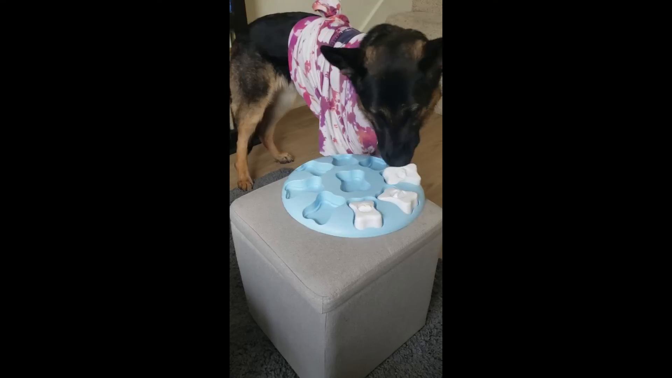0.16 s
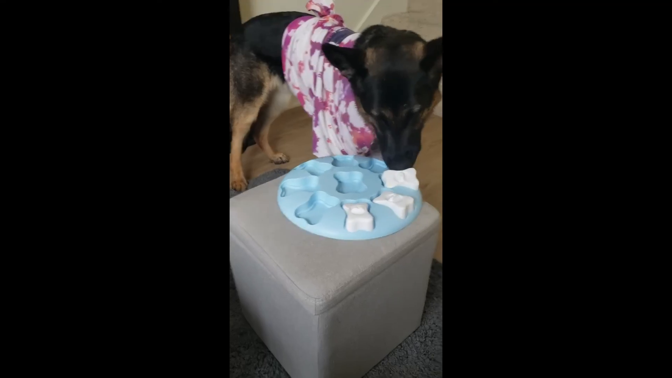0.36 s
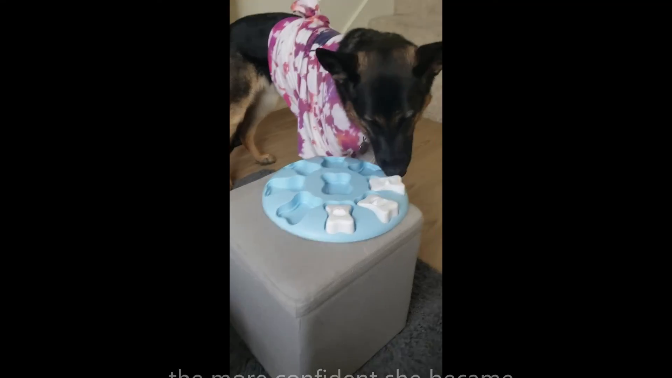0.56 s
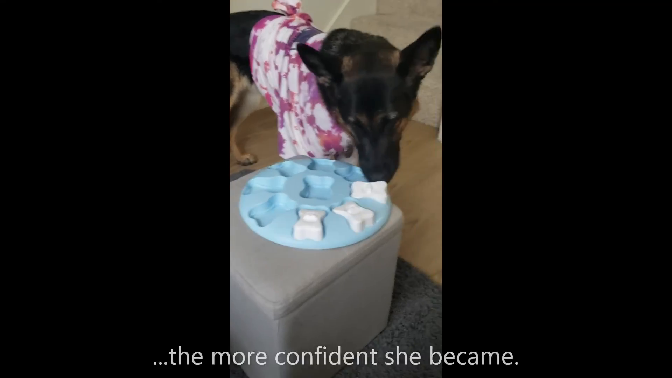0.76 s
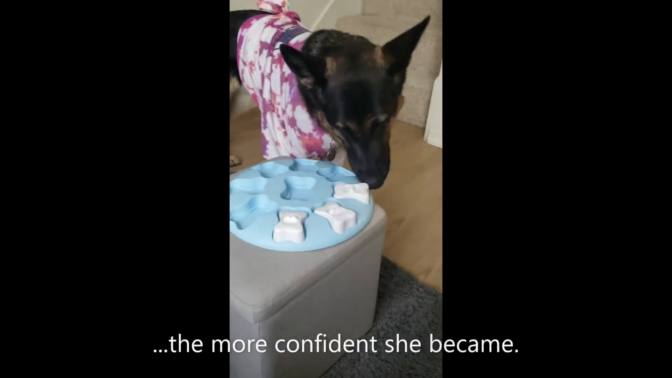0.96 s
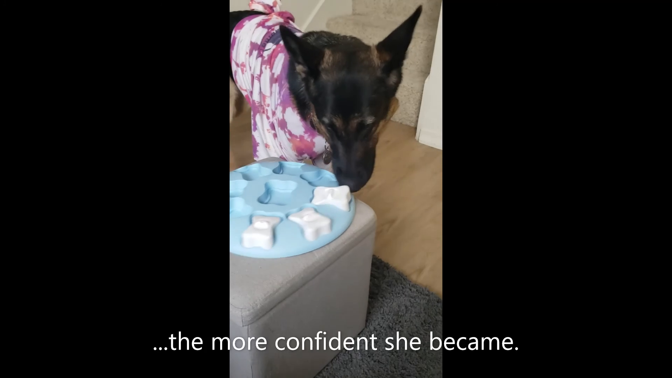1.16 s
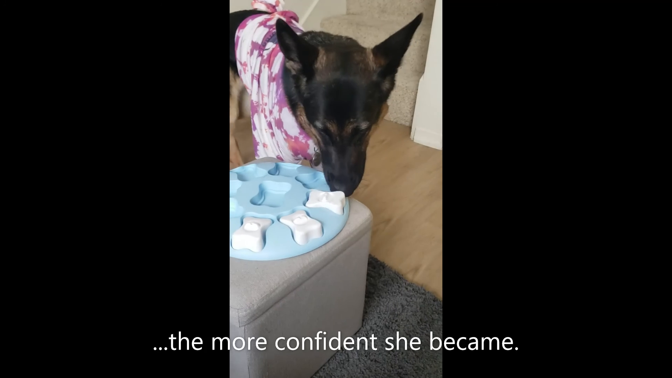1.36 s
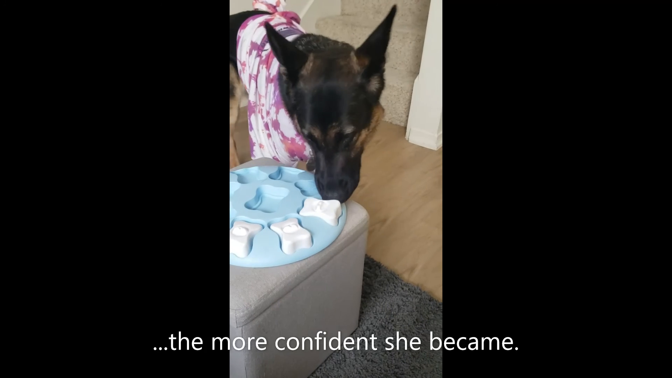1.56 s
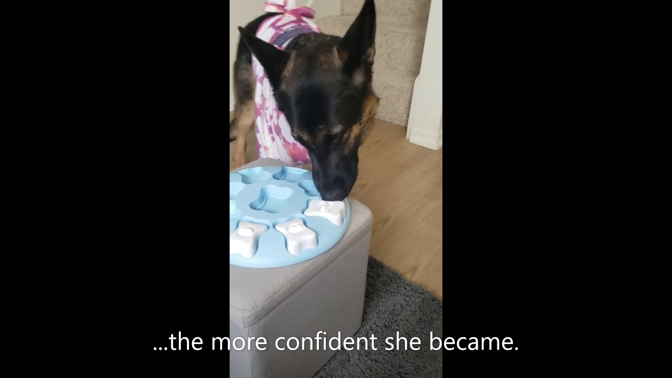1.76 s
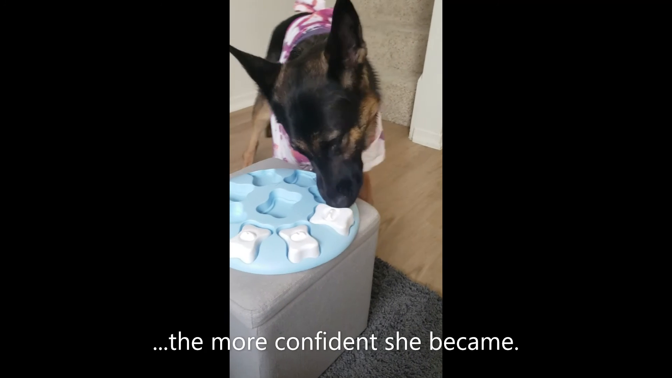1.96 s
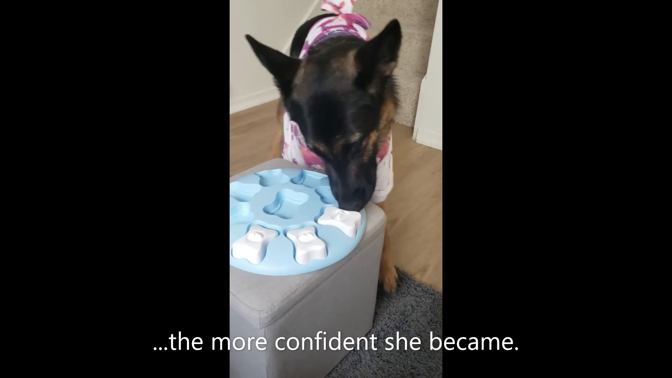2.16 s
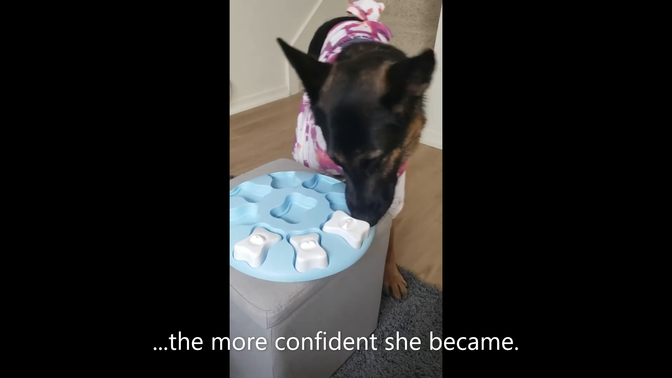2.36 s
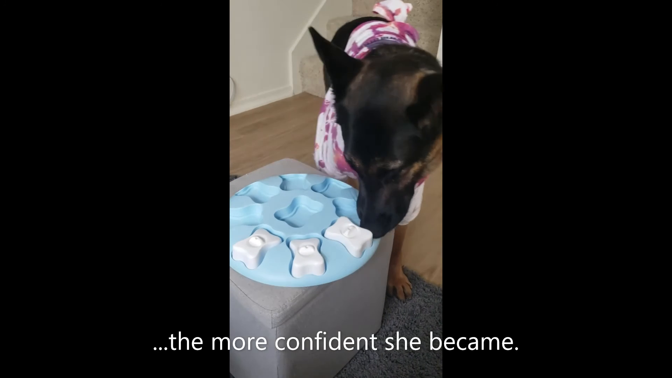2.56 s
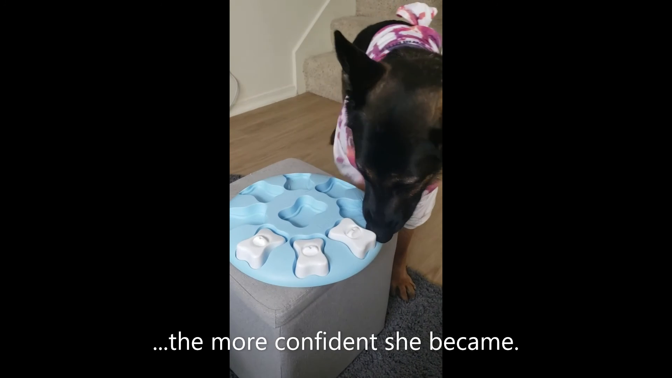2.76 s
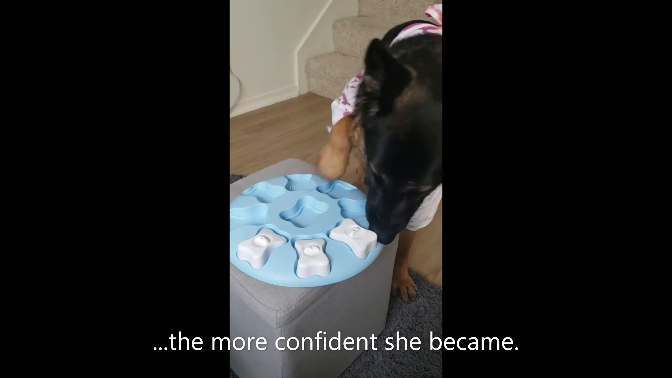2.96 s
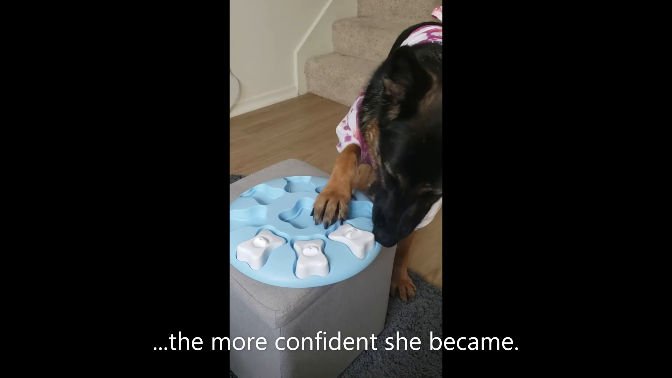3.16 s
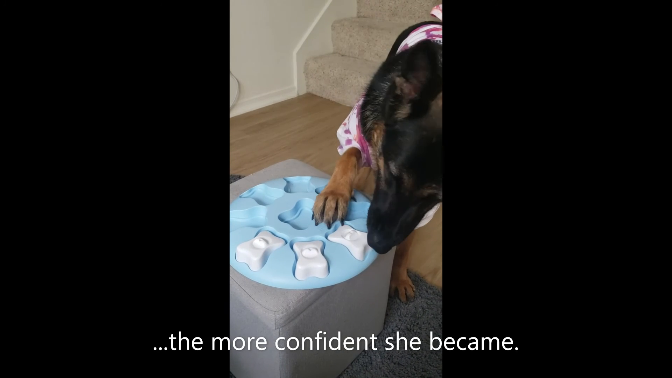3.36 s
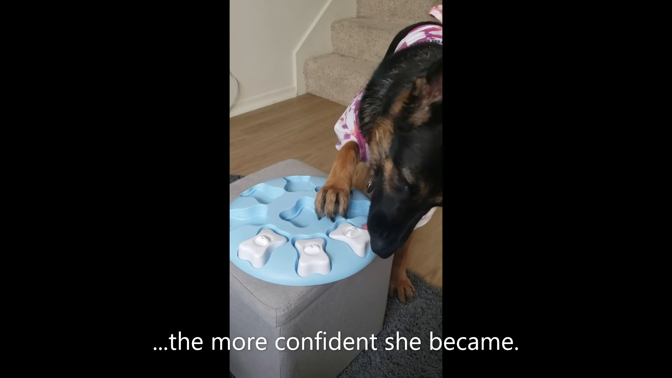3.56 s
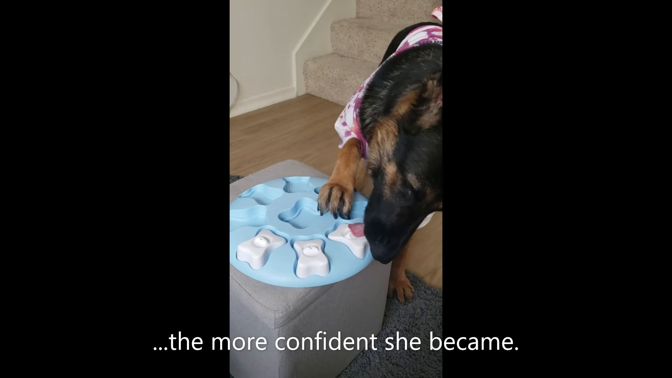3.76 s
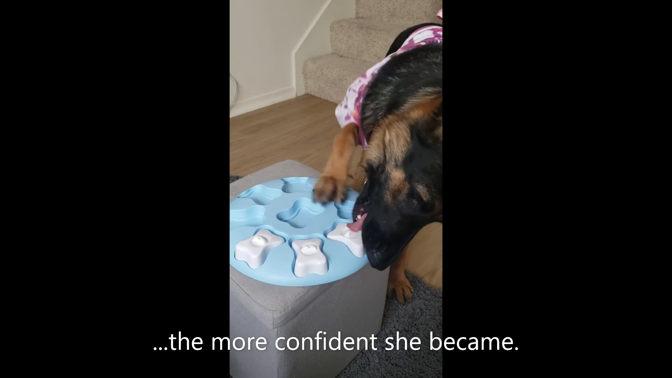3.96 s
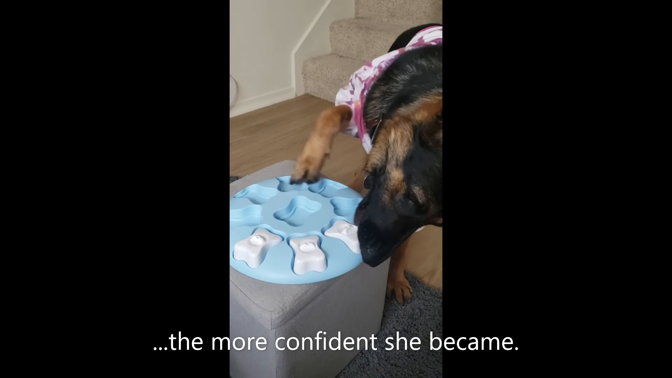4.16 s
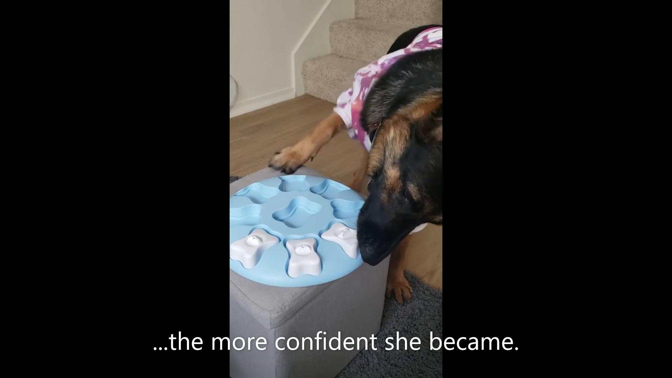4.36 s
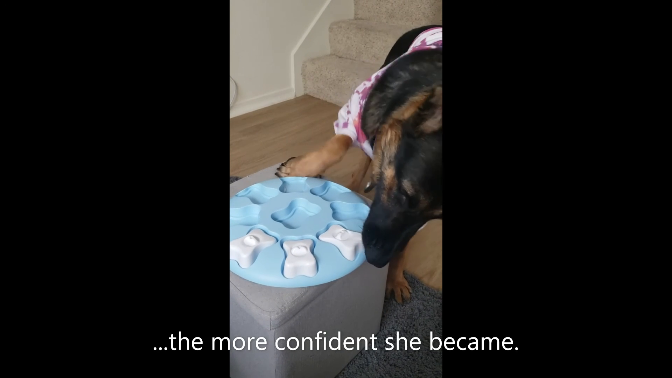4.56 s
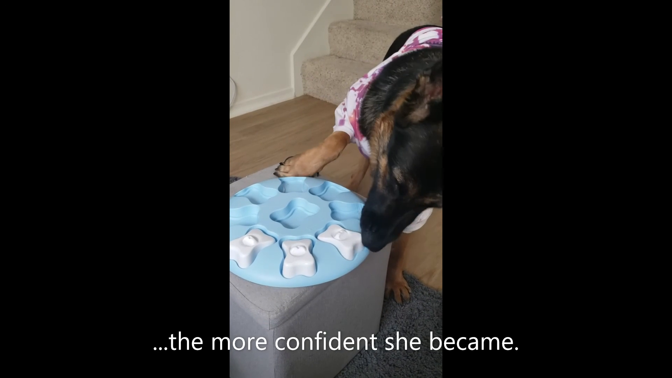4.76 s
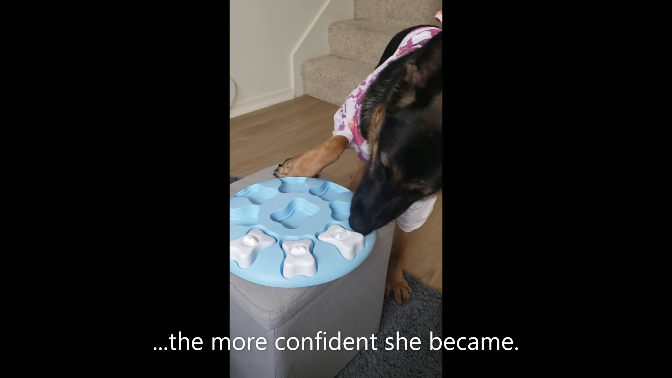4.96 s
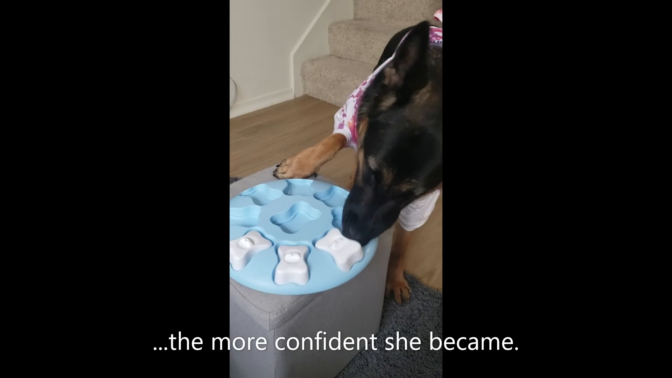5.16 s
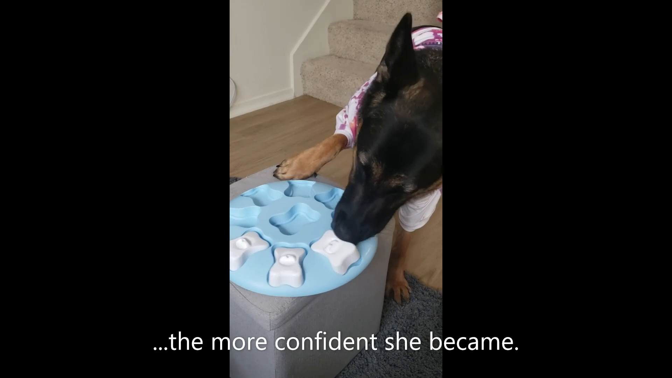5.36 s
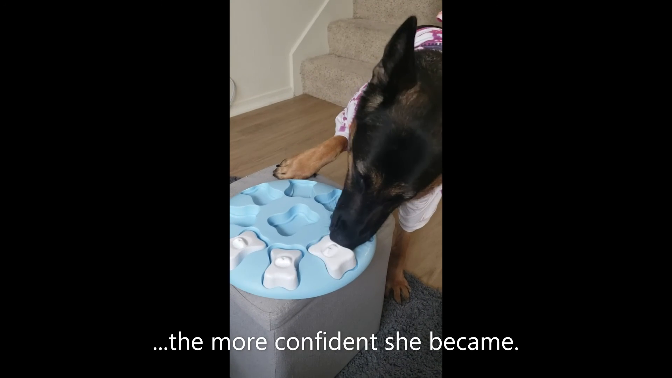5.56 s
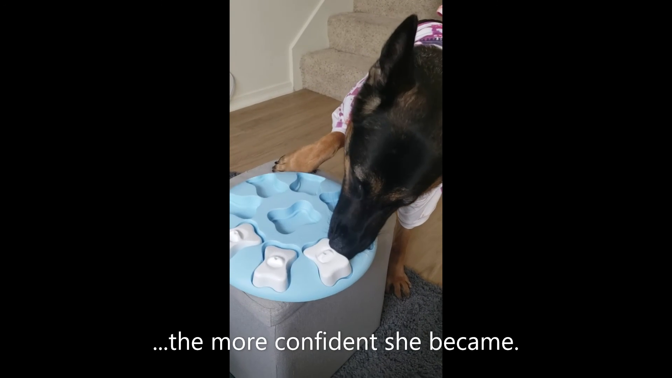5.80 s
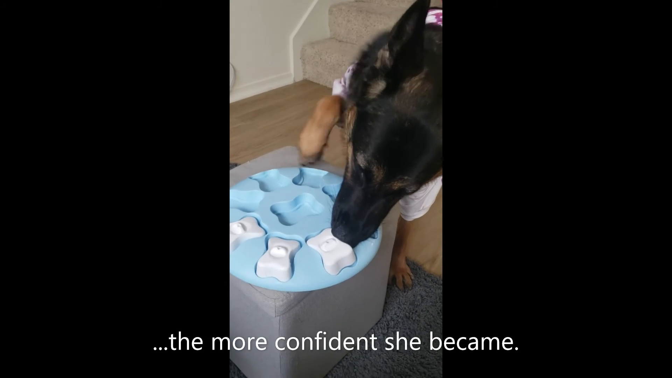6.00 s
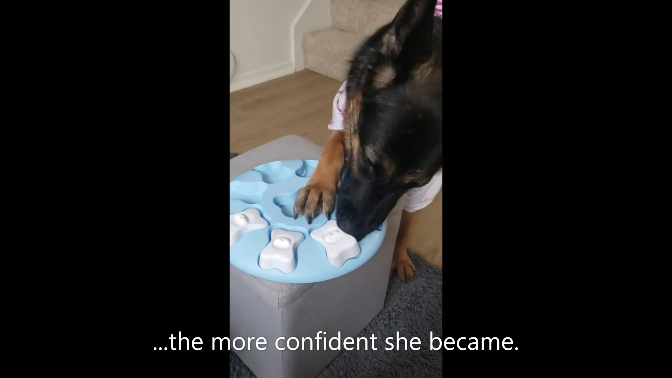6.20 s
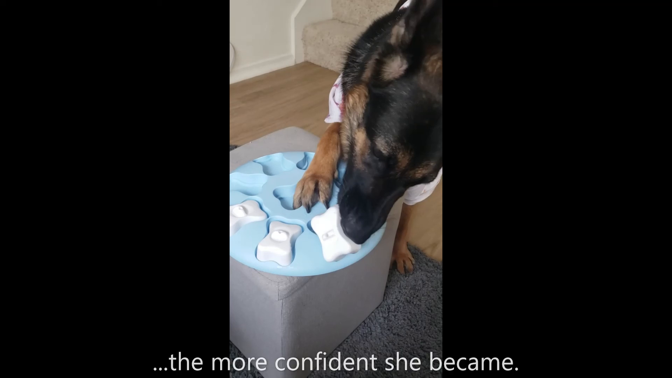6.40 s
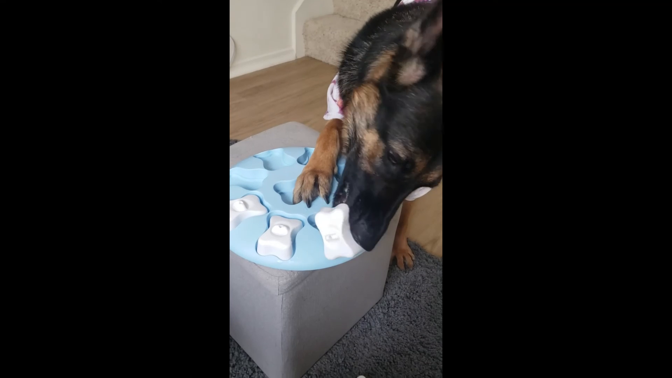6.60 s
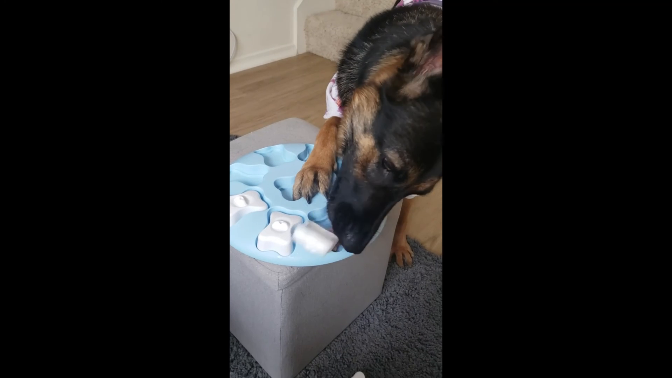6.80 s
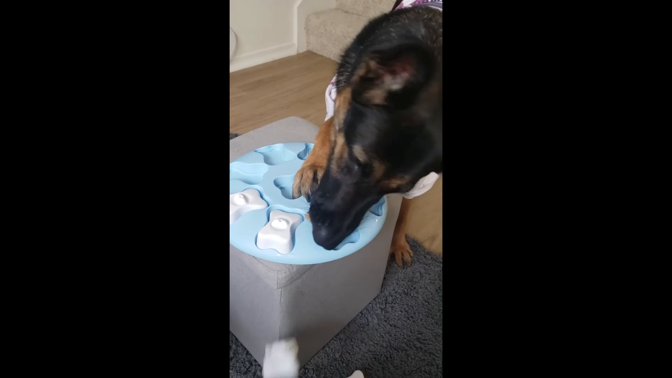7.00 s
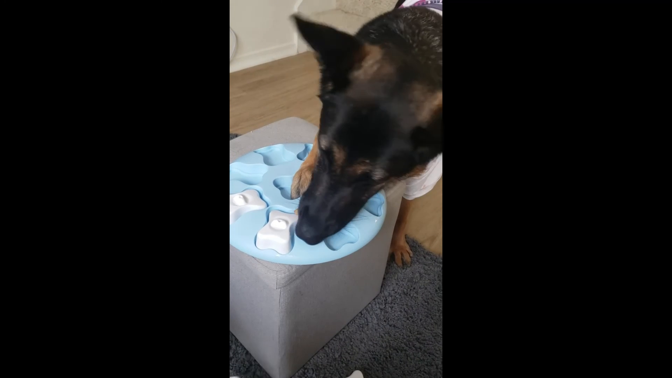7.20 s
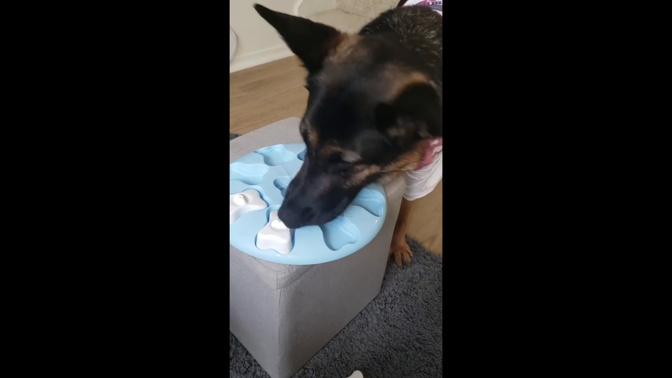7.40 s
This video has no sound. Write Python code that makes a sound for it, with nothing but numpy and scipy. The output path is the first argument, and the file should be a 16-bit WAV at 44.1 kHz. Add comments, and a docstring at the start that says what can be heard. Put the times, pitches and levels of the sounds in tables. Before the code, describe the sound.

Stereo close pickup of a dog working a plastic treat toy on a padded stool. Irregular hollow knocks and cover rattles cluster early, with soft low bumps. After a quiet gap, claws hit and scrape brightly; light taps and snuffles follow. Late firm clacks pry a piece loose, which lands with a short muffled thud. Short room echo, very quiet room tone.

```python
"""Dog at a plastic treat puzzle

A dog noses and paws a hollow plastic tray on a padded stool in a small, live room.
Struck covers and tray are damped modes plus a noise crack; paw thumps ring the stool and tray bottom.
Scrapes, claw skids and snuffles are swelling, grainy noise; a damp nose gives one falling squeak.
At last a cover is pried out and thuds onto the carpet as low damped modes.
Noise tails make the echo, shaped noise the room tone and a soft opening rush; the level dips briefly."""
import sys
import numpy as np
from scipy import signal
from scipy.fft import rfft, irfft, next_fast_len
from scipy.io import wavfile

SR = 44100
rng = np.random.default_rng(int(sys.argv[2]) if len(sys.argv) > 2 else 0)


def waveform_to_disk(signal):
    """Save audio, clipped to [-1, 1], as 16-bit WAV at the path in sys.argv[1]."""
    frames = np.transpose(np.atleast_2d(signal))
    scaled = np.clip(frames, -1, 1) * 32767
    samples = np.round(scaled).astype(np.int16)
    wavfile.write(sys.argv[1], SR, samples)


N = 328104

# Covers and claws strike the tray:
# (time [s], strength [dB], cover ring over tray knock [dB], hardness [0-1], left over right [dB])
CONTACTS = [(.305, -31.5, -1, 0.18, -1.5), (.579, -18.5, 17, 0.13, 1), (.598, -19.5, 3.5, 0.67, 1),
            (.69, -25, 1, 0.29, -4), (.903, -24, 1, 0.69, -1), (1.045, -28.5, 1, 0.35, -2.5),
            (1.24, -25.5, 21, 0.38, -2), (1.29, -31.5, 22, 0.26, 4), (1.362, -31, 3.5, 0.33, 0),
            (1.438, -30, 12, 0.16, -3), (1.492, -31, 10, 0.22, -3.5), (1.545, -40.5, 5.5, .03, -1),
            (1.646, -42.5, 2, 0.08, -4), (1.7006, -28.5, -1.5, 0.68, -1.5), (1.77, -36, -13, 0.17, -4),
            (1.972, -33.5, 12, 0.07, 1), (2.067, -33, 3, 0.29, -2), (2.0876, -30, -3.5, 0.36, 1.5),
            (2.146, -26, 2, 0.65, 0), (3.052, -39.5, 0.5, 0.56, 0), (3.0985, -25.5, -2, 0.98, 0),
            (3.1052, -19.5, 9.5, .88, 1), (3.133, -29.5, 14, 0.93, 3), (3.1403, -22, 19.5, 0.3, -1),
            (3.159, -24, 8.5, 0.82, 0.5), (3.29, -45.5, 12, 0.75, -6), (3.3945, -40, -11, 0.51, -0.5),
            (3.5, -32, 9, 0.51, 0.5), (3.51, -36.5, -1, 0.5, -5.5), (3.675, -37.5, -4.5, 0.44, 0),
            (3.919, -51, -9, .3, -5), (4.043, -42, -15, .2, -2), (4.092, -31, -7, 0.08, 3),
            (4.122, -38.5, 1, 0.27, 0), (4.148, -35.5, -4, 0.43, -4), (4.162, -38, 5, 0.51, 12),
            (4.1893, -28, -12, .38, 0), (4.429, -32, -1, 0.53, -2), (4.45, -34.5, -3, 0.48, 4.5),
            (4.49, -39.5, -12.5, 0.51, -3), (4.662, -46, -17.5, 0, -8.5), (4.826, -40.5, -8.5, 0.42, -1.5),
            (5.123, -34.5, -2, 0.35, -1), (5.188, -46, 1, 0.43, -2), (5.266, -33.5, 10, 0.02, -1.5),
            (5.453, -55, 7, .05, 3), (5.511, -49, -0.5, 0, 0), (5.818, -39, -6.5, 0.17, 1),
            (6.166, -33.5, 3.5, 0.85, 3), (6.1744, -22, 3, .25, 1), (6.195, -35, 1, 0.78, -3),
            (6.4065, -25.5, 2.5, 0.45, -0.5), (6.415, -23.5, 3.5, 0.87, 2.5), (6.4303, -37, 0, 0.82, -10.5),
            (6.812, -27, -2.5, 0.63, -1), (7.14, -38.5, 2.5, 0.49, 1), (7.347, -51, 2, .22, -3)]
# Hollow tray modes: (frequency [Hz], level [dB], t60 [s])
TRAY_MODES = [(370, -6, .035), (533.5, -4.5, 0.034), (709.3, 5.5, 0.02), (830, -2, 0.027)]
# Loose cover modes: (frequency [Hz], level [dB], t60 [s])
COVER_MODES = [(1075.5, 0.5, .026), (1203, -0.5, .032), (1355, -2.5, .024), (1576, -4, 0.024),
               (2720, -15.5, 0.055), (2970, -15.5, .03)]
# Crack spectrum of a contact: (frequency [Hz], level [dB])
CRACK_SPECTRUM = [(300, -18), (1200, 0.5), (1900, -1.5), (2700, -0.5), (3300, -4), (4300, -5.5),
                  (5700, -4.5), (8500, -8), (12000, 3.5), (16000, 9)]
# Covers and claws dragged over the tray: (peak time [s], length [s], level [dB])
SCRAPES = [(0.252, .17, -49), (.545, .08, -51), (0.861, .085, -48.5), (1.281, 0.14, -44),
           (1.386, 0.11, -54), (2.029, 0.12, -48), (3.068, .05, -41.5), (3.144, 0.054, -35.5),
           (3.506, .085, -45.5), (3.692, .07, -37), (4.107, .15, -46.5), (4.2, .12, -47),
           (4.518, .2, -49.5), (4.673, .05, -56.5), (5.191, 0.19, -53), (5.859, .037, -46.5),
           (6.016, 0.056, -57), (6.202, .07, -34), (6.424, .05, -39), (6.731, 0.12, -47.5),
           (6.896, 0.096, -57.5), (7.12, 0.089, -52), (7.384, .12, -53.5)]
# Scrape spectrum before tilt: (frequency [Hz], level [dB])
SCRAPE_SPECTRUM = [(120, -25.5), (350, -4), (600, 2), (800, -3), (950, -3), (1200, -4), (1900, -11),
                   (2900, -22), (4500, -33), (9000, -46.5)]
# Claws skid on the plastic: (peak time [s], length [s], level [dB])
SKIDS = [(.607, 0.059, -43.5), (3.108, .07, -25.5), (3.155, 0.066, -25.5), (6.184, 0.017, -36.5),
         (6.422, 0.031, -29)]
# Skid spectrum before tilt: (frequency [Hz], level [dB])
SKID_SPECTRUM = [(500, -14.5), (1100, -10.5), (2000, -4.5), (2600, 5.5), (3200, 6.5), (3700, 5), (4500, -5),
                 (8500, -14), (12000, -10), (16000, -20)]
# Paw and muzzle press the tray into the stool: (time [s], strength [dB], cushion pitch factor [ratio])
THUMPS = [(1.215, -47, 1.52), (1.236, -36.5, 1.02), (1.267, -38.5, .92), (1.341, -47, 1.8),
          (3.159, -50.5, 1.7), (3.688, -43.5, 1.3), (4.306, -56, 1.86), (4.345, -60, 1.7),
          (4.386, -52.5, 1.36), (4.499, -57, 2.25), (5.81, -45.5, 1.55), (5.852, -55.5, 2.3),
          (6.164, -37.5, 1.8), (6.181, -39, 1.2), (6.822, -46, 1.2)]
# Stool cushion modes at pitch factor 1: (frequency [Hz], level [dB], t60 [s])
STOOL_MODES = [(59.6, 1.5, 0.18), (85.3, -5.5, 0.11), (114, -10.5, 0.035)]
# Tray bottom modes: (frequency [Hz], level [dB], t60 [s])
BOTTOM_MODES = [(140, -0.5, 0.09), (199, 4, 0.031), (267.4, -1, 0.075), (399.6, -0.5, 0.055)]
# Dog snuffles in the wells: (peak time [s], length [s], level [dB])
SNUFFLES = [(.27, 0.19, -64), (1.07, 0.43, -65.5), (1.27, 0.18, -53), (1.38, 0.12, -54.5),
            (1.53, 0.19, -59.5), (2.24, 0.43, -56), (2.81, 0.26, -64.5), (3.51, 0.15, -61),
            (3.695, .1, -59), (4.07, .145, -46), (4.17, 0.18, -52), (4.3, 0.083, -46.5),
            (4.55, 0.16, -62.5), (5.22, .125, -69), (5.86, 0.19, -70.5), (6.34, 0.15, -58.5),
            (6.765, 0.051, -41.5), (6.935, 0.042, -54.5)]
# Snuffle spectrum before tilt: (frequency [Hz], level [dB])
SNUFFLE_SPECTRUM = [(400, -9.5), (1500, 4), (3000, 6), (4500, -1), (6500, 6), (8500, -3), (12000, 1),
                    (16000, -4)]
# Squeak harmonics: (multiple of the pitch [ratio], level [dB])
SQUEAK_TONES = [(1, -0.5), (2, 1.5), (3, -9.5), (4, -8.5), (5, -43)]
# Cover lands on the carpet: (time [s], strength [dB])
LANDINGS = [(7.147, -28.5)]
# Carpeted floor modes: (frequency [Hz], level [dB], t60 [s])
FLOOR_MODES = [(77.3, -21, 0.5), (110, -16, 0.42), (149, 0, 0.078), (187.3, 0.5, 0.068), (296.8, 2, 0.092),
               (364, 1, 0.079), (445, 5, 0.018), (630, 8, 0.012), (990, 3, 0.013)]
# Echo decay: (frequency [Hz], t60 [s])
ECHO_T60 = [(80, 0.62), (300, 0.42), (1000, 0.45), (3000, 0.39), (6000, 0.42), (10000, 0.25), (16000, 0.25)]
# Echo strength off the walls: (frequency [Hz], level [dB])
ECHO_LEVEL = [(60, -11), (170, -1.5), (350, -0.5), (700, -7.5), (1200, -5), (2500, -3), (5000, -2),
              (9000, -1), (16000, 5)]
# Left-right likeness of diffuse sound: (frequency [Hz], correlation [0-1])
LIKENESS = [(60, 0.99), (250, 0.57), (700, 0.59), (2000, .15), (10000, 0.035)]
# Spectrum of the soft opening rush: (frequency [Hz], level [dB])
RUSH_SPECTRUM = [(35, -51), (60, -15), (212, -3.5), (354, -17), (417, -7), (1040, 0.5), (1380, -14.5),
                 (1700, -6), (2410, -15.5), (3500, -10.5), (5330, -14), (6580, -25.5), (16000, -40)]
# Room tone spectrum: (frequency [Hz], level [dB])
ROOM_TONE_SPECTRUM = [(15, -37.5), (25, -15.5), (97, 0), (170, -6), (363, -6.5), (463, -19), (624, -13),
                      (936, -17.5), (1740, -22), (2410, -23.5), (2990, -27), (7110, -28), (9070, -37),
                      (11600, -22.5), (16000, -20)]

TOP_HZ = 16150
TIME_S = np.arange(N) / SR
AGE_S = np.arange(SR // 4) / SR  # since a blow
# contact: band edge at hardness 0 and its climb to hardness 1; likewise the crack level
SOFT_EDGE_HZ, EDGE_OCTAVES = 1315, 3.19
SOFT_CRACK_DB, CRACK_RISE_DB = -17, 25
# cover falling back: median delay, level change, hardness ratio
REBOUND_S, REBOUND_DB, REBOUND_HARDNESS = 0.016, -13.5, 0.55
# dragged cover ticks: level over the scrape, scatter either way, upper limit
TICKS_PER_S, TICK_DB, TICK_SCATTER_DB = 16, -1.5, 3
TICK_HARDNESS, TICK_TOP_DB = 0.42, -42
# tray bottom over the thump, rising with cushion pitch
BOTTOM_DB, BOTTOM_DB_PER_OCTAVE = -9.5, 10.5
# level with no tilt; tilt [dB/octave] per dB above it
SCRAPE_PLAIN_DB, SCRAPE_TILT = -46, 0.38
SKID_PLAIN_DB, SKID_TILT = -32, 0.25
SNUFFLE_PLAIN_DB, SNUFFLE_TILT = -53.5, -0.12
SQUEAK_AT_S, SQUEAK_ATTACK_S, SQUEAK_HOLD_S, SQUEAK_RELEASE_S = 5.864, 0.0055, 0.0052, 0.015
SQUEAK_START_HZ, SQUEAK_SAG_HZ_PER_S, SQUEAK_DB = 678, 3800, -44.5
RUSH_DB, RUSH_END_S, RUSH_RELEASE_S = -57.5, 0.217, 0.024
ROOM_TONE_DB = -67
DIP_AT_S, DIP_WIDTH_S, DIP_DB = 0.2095, 0.016, -25.5


def amp(db):
    """Decibels to gain."""
    return 10 ** (np.asarray(db) / 20)


def unit(x):
    """Scale to rms 1."""
    return x / np.sqrt(np.mean(x ** 2) + 1e-20)


def burst(x, span_s):
    """Scale to the energy of rms 1 held for span_s."""
    return x / np.sqrt(np.mean(x ** 2) * x.shape[-1] / (span_s * SR))


def fade(t_s, t60_s):
    """Exponential decay, 60 dB in t60_s."""
    return np.exp(-np.log(1000) * t_s / t60_s)


def along(points, hz):
    """Interpolate (Hz, value) points on a log-frequency axis."""
    f, v = np.transpose(points)
    return np.interp(np.log(hz + 1), np.log(f + 1), v)


def filtered(x, response):
    """Multiply the spectrum of x by a response of frequency."""
    n = x.shape[-1]
    m = next_fast_len(n + 4096)
    return irfft(rfft(x, m) * response(np.fft.rfftfreq(m, 1 / SR)), m)[..., :n]


def coloured(x, spectrum):
    """Shape x by a spectrum, then scale to rms 1."""
    return unit(filtered(x, lambda hz: amp(along(spectrum, hz))))


def add(track, at_s, sound):
    """Mix a sound in from at_s, cut at the end of the track."""
    part = track[:, int(at_s * SR):][:, :sound.shape[-1]]
    part += sound[..., :part.shape[-1]]


def pair(size, spread):
    """Near-source white noise: shared mid, opposite side signal scaled by spread."""
    mid, side = rng.standard_normal((2, size))
    return np.array([mid + spread * side, mid - spread * side])


def diffuse(size):
    """White noise from all round: alike in the bass, nearly unrelated in the treble."""
    def mid_side_gains(hz):
        angle = np.arccos(np.clip(along(LIKENESS, hz), -1, 1)) / 2
        return np.array([np.cos(angle), np.sin(angle)])

    mid, side = filtered(rng.standard_normal((2, size)), mid_side_gains)
    return np.array([mid + side, mid - side])


def ring(modes, detune, spread, attack_s):
    """Damped modes; random strength, pitch and stereo phase stand for where the blow lands."""
    hz, db, t60_s = np.transpose(modes)[:, :, None]
    size, shift, phase = rng.standard_normal((3, len(modes), 1))
    alternate = np.pi * np.arange(len(modes))[:, None]  # neighbours start in opposite sign
    angle = 2 * np.pi * hz * (1 + detune * shift) * AGE_S + alternate
    level = amp(db + 2 * size) * fade(AGE_S, t60_s) * (1 - np.exp(-AGE_S / attack_s))
    return np.array([(level * np.sin(angle + ear * spread * phase)).sum(0) for ear in (1, -1)])


def splinter(t60_s, spread):
    """Short noise burst for dense plastic modes, even in strength across frequency."""
    spectrum = rfft(pair(len(AGE_S), spread) * fade(AGE_S, t60_s))
    even = irfft(spectrum / np.abs(spectrum), len(AGE_S))
    return even * fade(AGE_S, 10 * t60_s)


def strokes(rows, spectrum, catches_per_s, noise_db, spread, rise_share, tilt):
    """Swelling strokes: random tiny catches over smooth noise, tilted by tilt(dB) in dB per octave."""
    out = np.zeros((2, N))
    t = np.arange(-SR // 3, SR // 3) / SR  # from the peak
    rise = np.clip(rise_share, 0.1, 0.9)
    side_share = np.where(t < 0, rise, 1 - rise)
    for peak_s, length_s, db in rows:
        catches = (rng.random(len(t)) < catches_per_s / SR) * np.sign(pair(len(t), spread))
        grain = unit(catches) + amp(noise_db) * unit(pair(len(t), spread))
        tilted = [(hz, level + tilt(db) * np.log2(hz)) for hz, level in spectrum]
        swell = np.exp(-3 * (t / length_s / side_share) ** 2)  # -26 dB at both ends of length_s
        sound = amp(db) * swell * coloured(grain, tilted)
        add(out, max(peak_s + t[0], 0), sound[:, peak_s + t >= 0])
    return out


def contact(db, cover_db, hardness, pan_db):
    """One blow knocks the tray, rings the cover and cracks; a harder one reaches higher and cracks more."""
    edge_hz = min(SOFT_EDGE_HZ * 2 ** (EDGE_OCTAVES * hardness), TOP_HZ)
    lowpass = signal.butter(3, edge_hz, fs=SR, output="sos")

    def struck(sound):
        return burst(signal.sosfilt(lowpass, sound), span_s=0.0026)

    knock = struck(ring(TRAY_MODES, detune=0.05, spread=0.36, attack_s=0.00053))
    cover = amp(cover_db) * struck(ring(COVER_MODES, detune=0.027, spread=0.7, attack_s=0.000077))
    body = (knock + cover) / np.hypot(1, amp(cover_db))
    crack_db = SOFT_CRACK_DB + CRACK_RISE_DB * hardness
    crack = amp(crack_db) * struck(coloured(splinter(t60_s=0.015, spread=0.9), CRACK_SPECTRUM))
    return amp(db) * (body + crack) * amp([[pan_db / 2], [-pan_db / 2]])


def clacks():
    """Each strike on the tray is followed by a softer fall back on the cover's other edge."""
    out = np.zeros((2, N))
    for at_s, db, cover_db, hardness, pan_db in CONTACTS:
        add(out, at_s, contact(db, cover_db, hardness, pan_db))
        delay_s = REBOUND_S * np.exp(0.15 * rng.standard_normal())
        rebound = contact(db + REBOUND_DB, cover_db, hardness * REBOUND_HARDNESS, -pan_db)
        add(out, at_s + delay_s, rebound)
    return out


def rattle():
    """A dragged cover ticks unevenly on its well, ringing as freely as in the contacts around it."""
    out = np.zeros((2, N))
    contact_s, _, contact_cover_db, _, _ = np.transpose(sorted(CONTACTS))
    for peak_s, length_s, db in SCRAPES:
        count = round(TICKS_PER_S * length_s)
        for k, (jitter, size, pan_db) in enumerate(rng.uniform(-1, 1, (count, 3))):
            at_s = peak_s + length_s * ((k + 0.5 + jitter / 2) / count - 0.5)
            tick_db = min(db + TICK_DB + TICK_SCATTER_DB * size, TICK_TOP_DB)
            cover_db = np.interp(at_s, contact_s, contact_cover_db)
            add(out, at_s, contact(tick_db, cover_db, TICK_HARDNESS, pan_db))
    return out


def friction():
    """Stick-slip: covers grate dully, claws skid brightly; both brighten under pressure."""
    grate = strokes(SCRAPES, SCRAPE_SPECTRUM, catches_per_s=380, noise_db=3, spread=0.96, rise_share=0.48,
                    tilt=lambda db: SCRAPE_TILT * (db - SCRAPE_PLAIN_DB))
    skid = strokes(SKIDS, SKID_SPECTRUM, catches_per_s=3600, noise_db=-1.5, spread=0.78, rise_share=0.56,
                   tilt=lambda db: SKID_TILT * (db - SKID_PLAIN_DB))
    return grate + skid


def thumps():
    """Weight booms in the stool; a squeezed cushion sounds higher and lets the tray bottom knock."""
    out = np.zeros((2, N))
    for at_s, db, pitch in THUMPS:
        cushion = [(hz * pitch, level, t60_s / pitch) for hz, level, t60_s in STOOL_MODES]
        boom = burst(ring(cushion, detune=0.035, spread=0.11, attack_s=0.0034), span_s=0.025)
        knock = burst(ring(BOTTOM_MODES, detune=0.017, spread=0.089, attack_s=0.00048), span_s=0.028)
        knock_db = db + BOTTOM_DB + BOTTOM_DB_PER_OCTAVE * np.log2(pitch)
        add(out, at_s, amp(db) * boom)
        add(out, at_s, amp(knock_db) * knock)
    return out * amp([[-1.3], [1.3]])  # right of centre


def snuffles():
    """Air hisses and fizzes between damp nose and plastic, fuller when blown harder."""
    return strokes(SNUFFLES, SNUFFLE_SPECTRUM, catches_per_s=360, noise_db=2.5, spread=1.0, rise_share=0.53,
                   tilt=lambda db: SNUFFLE_TILT * (db - SNUFFLE_PLAIN_DB))


def squeak():
    """Damp nose on plastic: slips lock into one short, falling harmonic tone."""
    age_s = TIME_S - SQUEAK_AT_S
    end_s = SQUEAK_ATTACK_S + SQUEAK_HOLD_S + SQUEAK_RELEASE_S
    level = np.clip(np.minimum(age_s / SQUEAK_ATTACK_S, (end_s - age_s) / SQUEAK_RELEASE_S), 0, 1)
    phase = 2 * np.pi * (SQUEAK_START_HZ - SQUEAK_SAG_HZ_PER_S * age_s / 2) * age_s
    tone = sum(amp(db) * np.sin(k * phase) for k, db in SQUEAK_TONES)
    return amp(SQUEAK_DB) * level * tone


def landing():
    """The freed cover thuds on the carpet, ringing the floor modes."""
    out = np.zeros((2, N))
    for at_s, db in LANDINGS:
        thud = burst(ring(FLOOR_MODES, detune=0.013, spread=0.12, attack_s=0.00032), span_s=0.025)
        add(out, at_s, amp(db) * thud)
    return out * amp([[-1.3], [1.3]])  # right of centre


def room(x, gap_s, block=11025):
    """Walls answer after a gap with a decaying noise tail, drawn afresh for each block."""
    out = np.zeros((2, N))
    for start in range(0, N, block):
        hz, t_s, bins = signal.stft(diffuse(SR * 2 // 3), SR, nperseg=256)
        decay = fade(t_s, along(ECHO_T60, hz)[:, None])
        tail = signal.istft(bins * decay, SR, nperseg=256)[1]
        tail /= np.sqrt(np.sum(tail ** 2) / 2)
        echo = signal.fftconvolve(x[:, start:start + block], tail, axes=1)
        add(out, start / SR + gap_s, echo)
    return filtered(out, lambda hz: amp(along(ECHO_LEVEL, hz)))


def background():
    """Quiet room tone as diffuse shaped noise, plus a soft noise rush at the start."""
    rush_level = amp(RUSH_DB) * np.clip((RUSH_END_S - TIME_S) / RUSH_RELEASE_S, 0, 1)
    rush = rush_level * coloured(pair(N, spread=0.96), RUSH_SPECTRUM)
    return rush + amp(ROOM_TONE_DB) * coloured(diffuse(N), ROOM_TONE_SPECTRUM)


def scene():
    """Near sources, their echo with a send level per source, and background, under one level dip."""
    plastic = clacks() + rattle()
    rubs = friction() + snuffles()
    booms = thumps()
    thud = landing()
    near = plastic + rubs + booms + thud + squeak()
    send = amp(-2.0) * plastic + amp(-6.5) * rubs + amp(-6.5) * booms + amp(-4.5) * thud
    echo = room(send, gap_s=0.008)
    dip_db = DIP_DB * np.exp(-((TIME_S - DIP_AT_S) / DIP_WIDTH_S) ** 2)
    return (near + echo + background()) * amp(dip_db)


def record(dry):
    """Steep low-pass at TOP_HZ."""
    return filtered(dry, lambda hz: 1 / np.sqrt(1 + (hz / TOP_HZ) ** 240))


dry = scene()
out = record(dry)
waveform_to_disk(out)
```